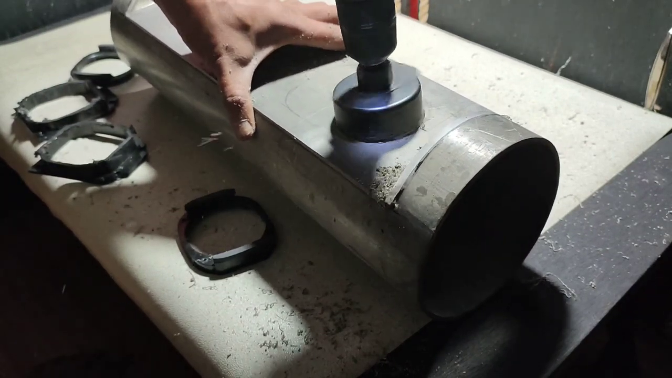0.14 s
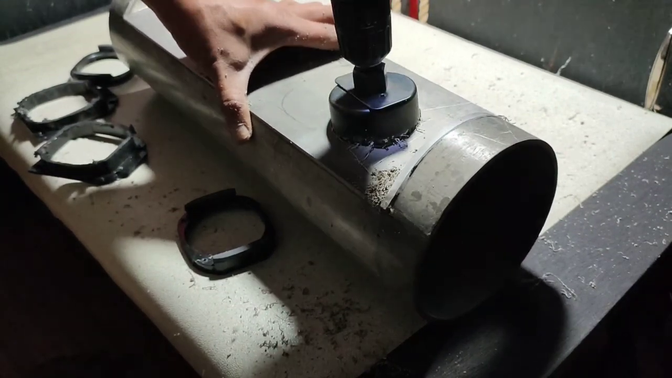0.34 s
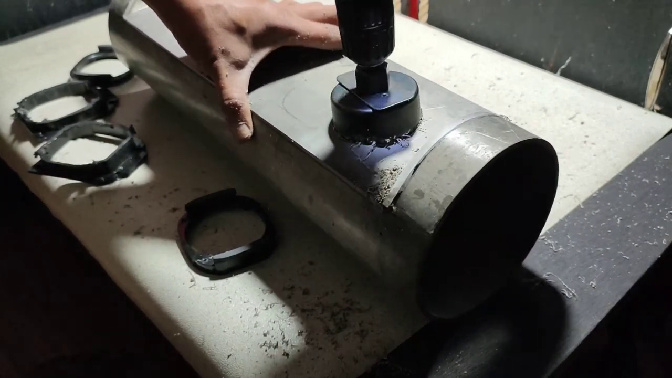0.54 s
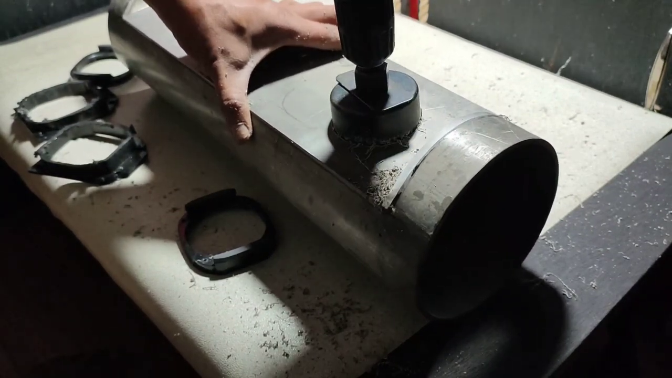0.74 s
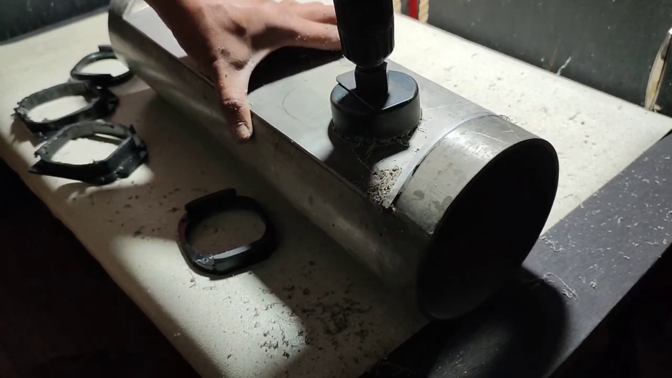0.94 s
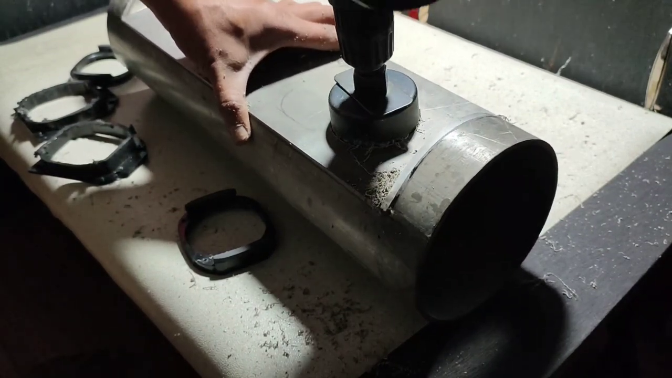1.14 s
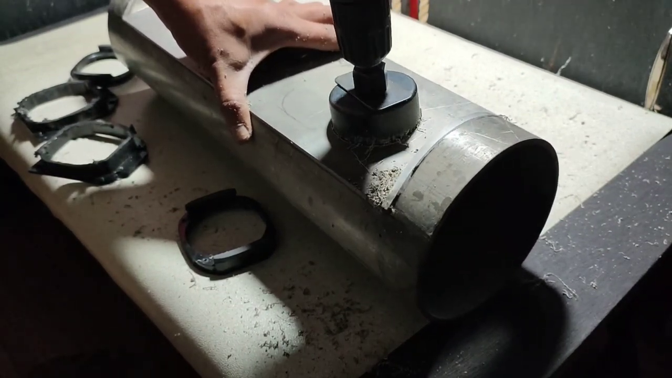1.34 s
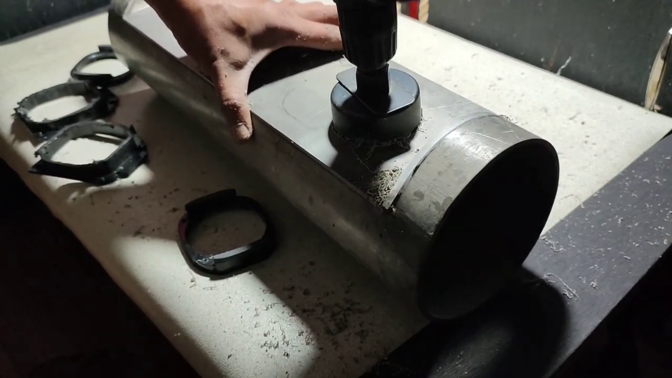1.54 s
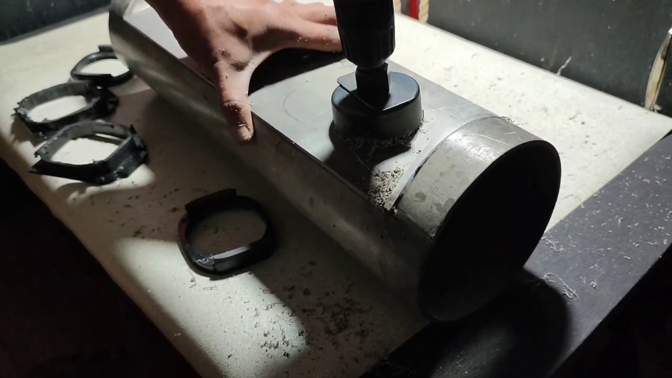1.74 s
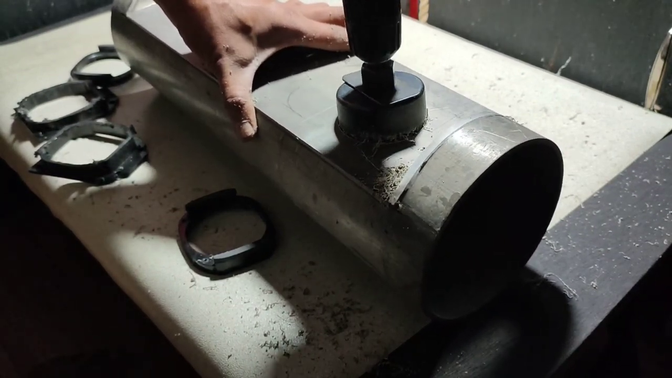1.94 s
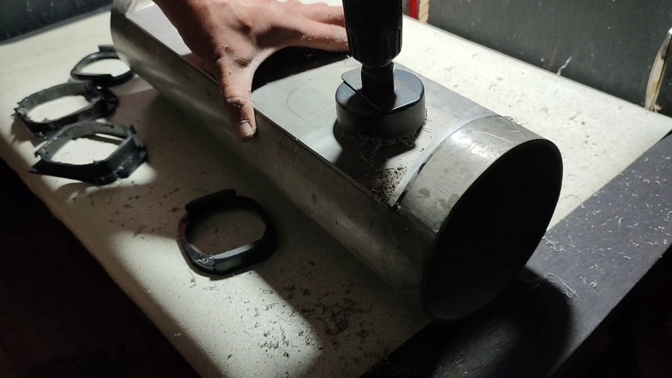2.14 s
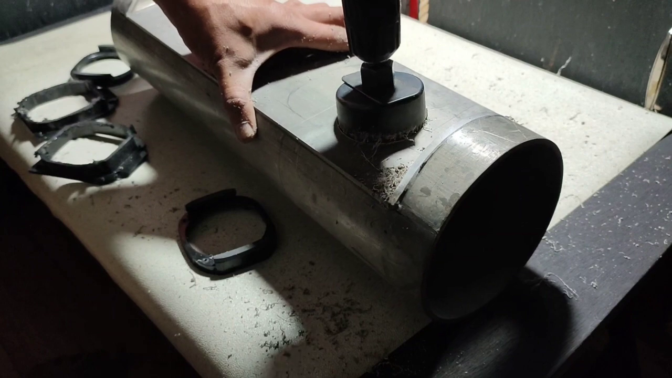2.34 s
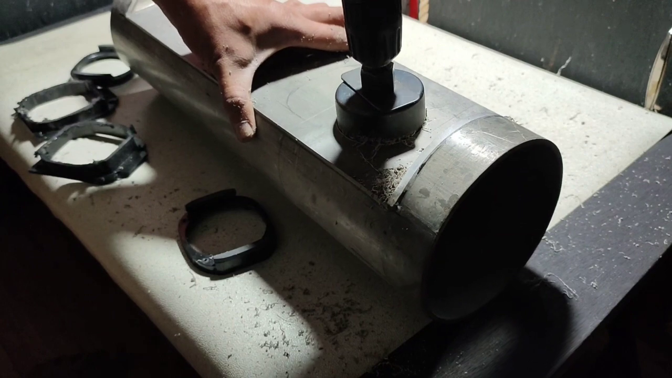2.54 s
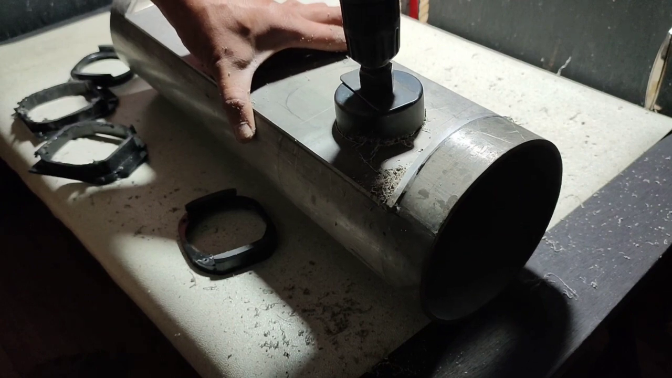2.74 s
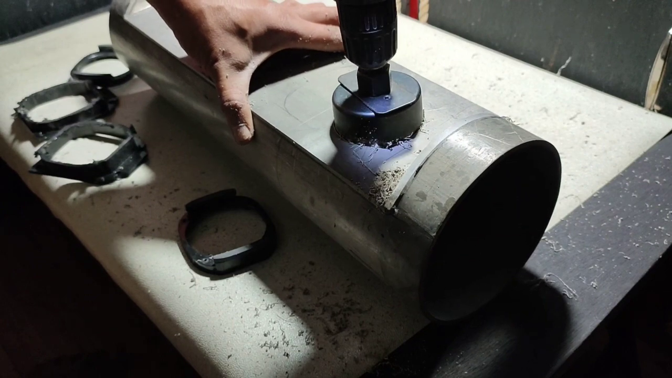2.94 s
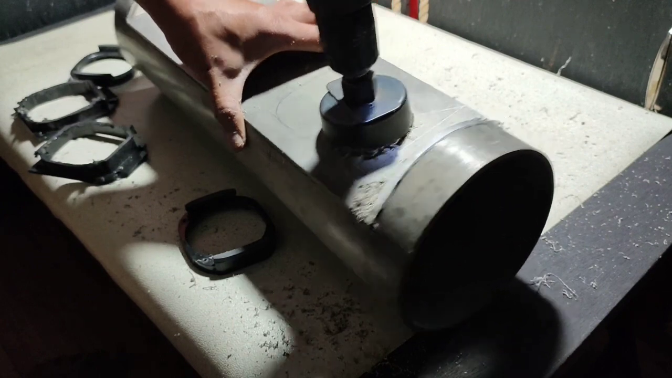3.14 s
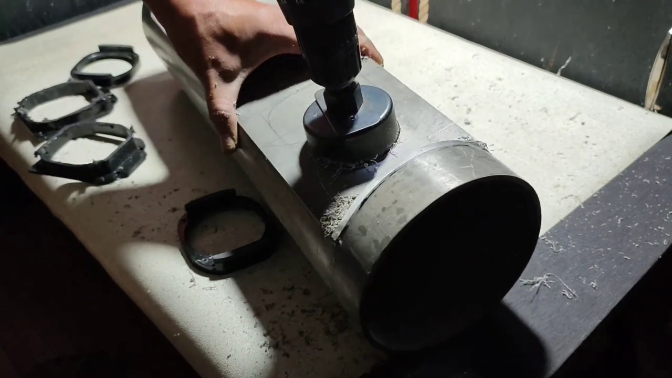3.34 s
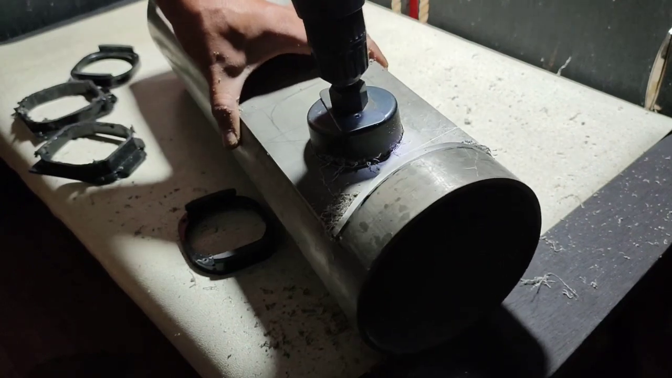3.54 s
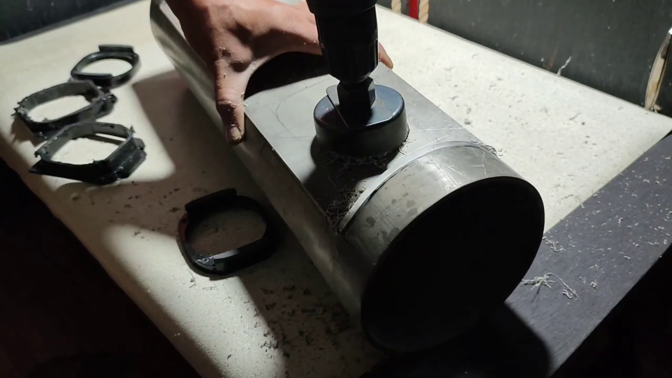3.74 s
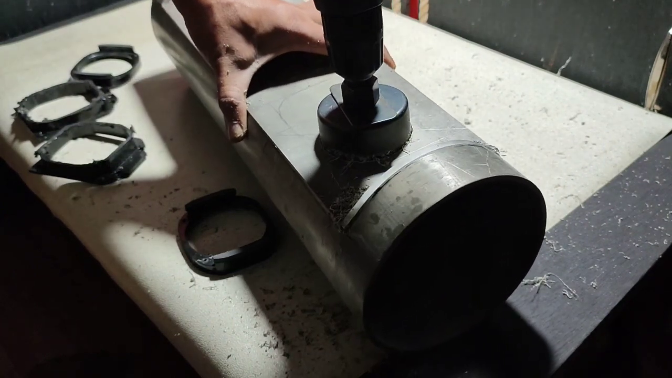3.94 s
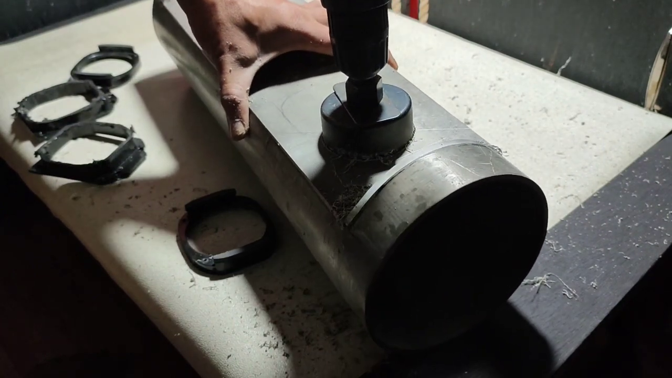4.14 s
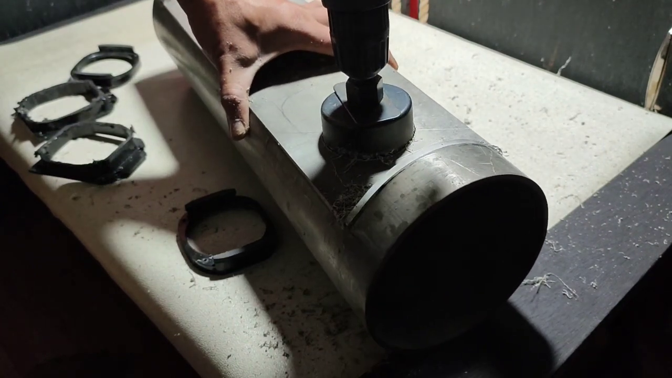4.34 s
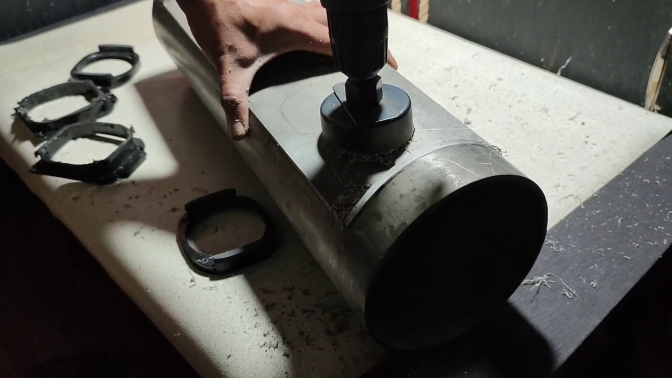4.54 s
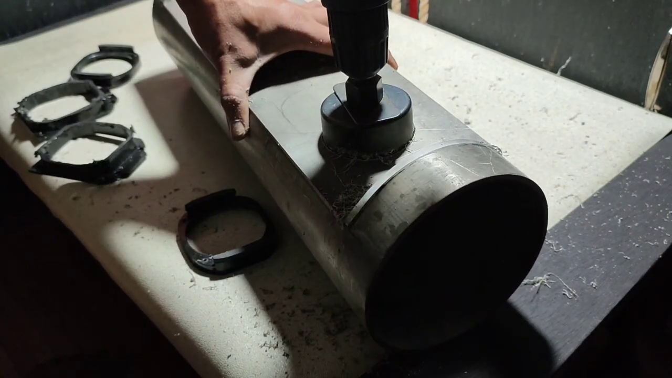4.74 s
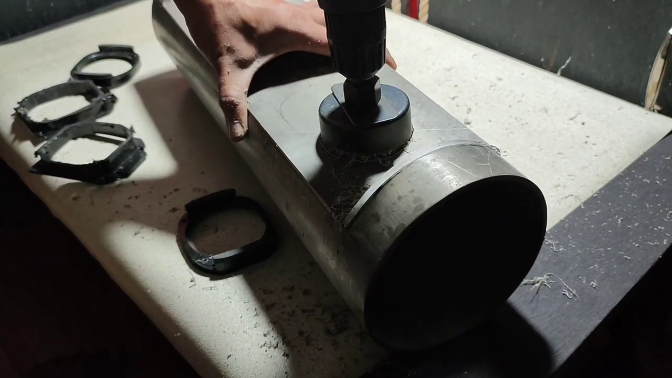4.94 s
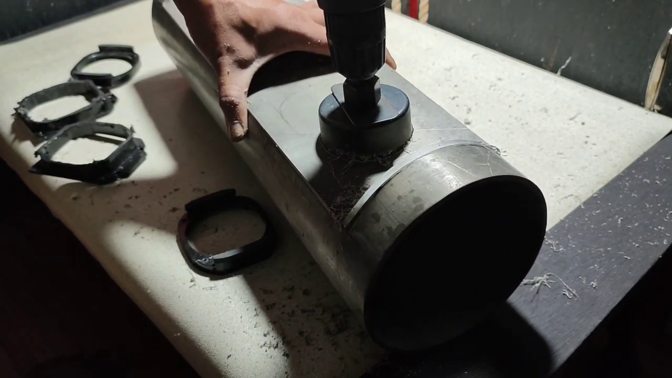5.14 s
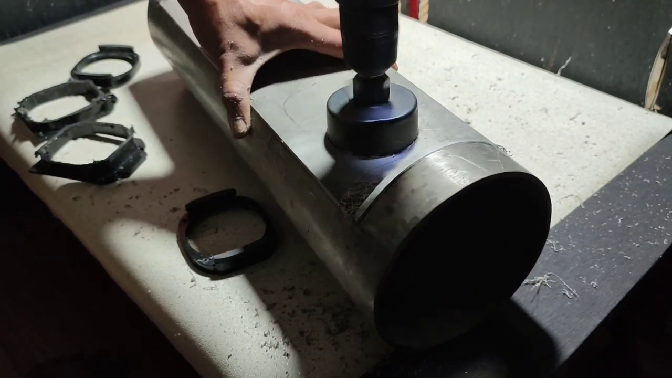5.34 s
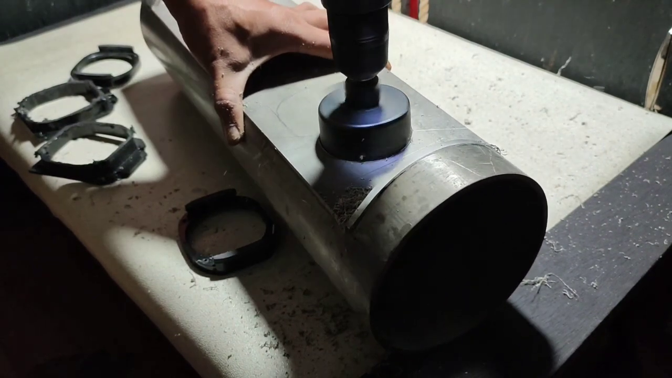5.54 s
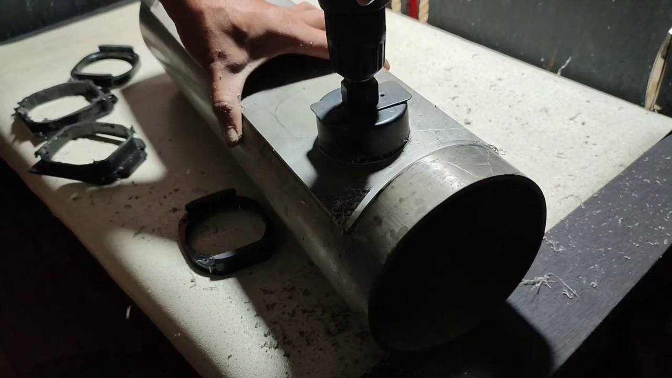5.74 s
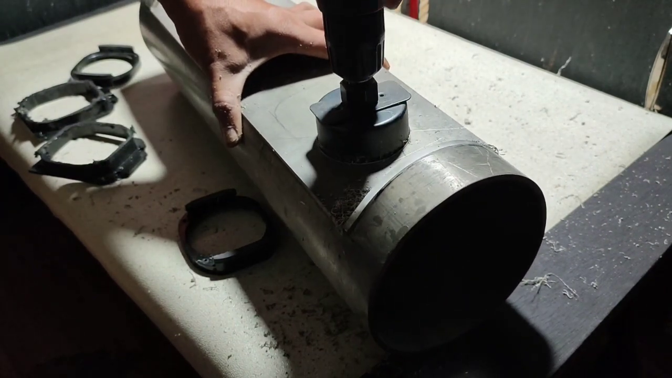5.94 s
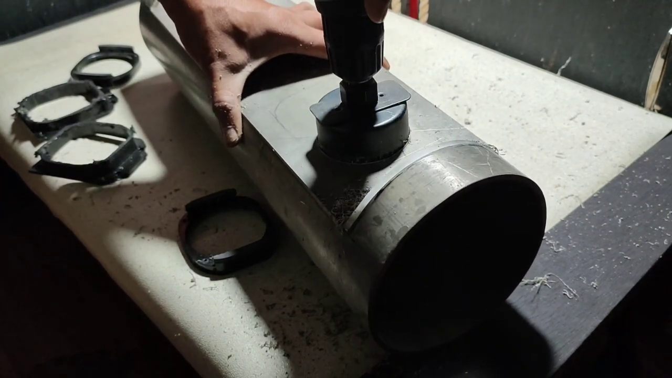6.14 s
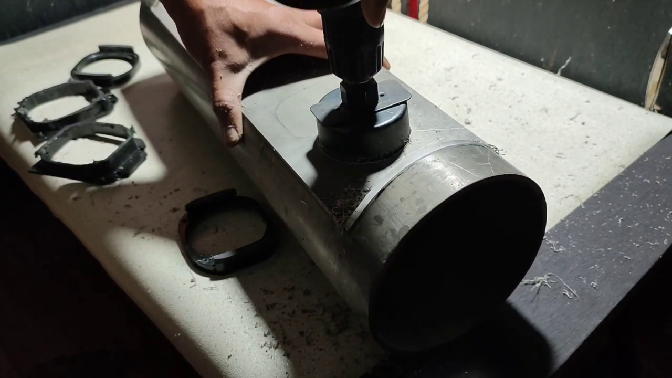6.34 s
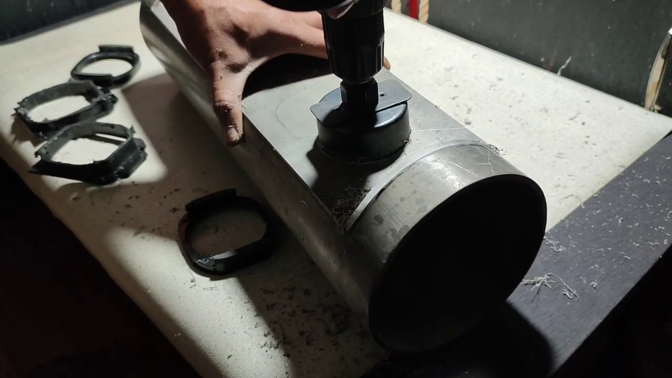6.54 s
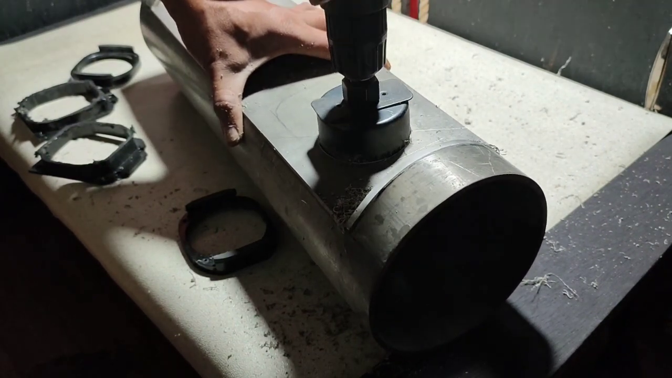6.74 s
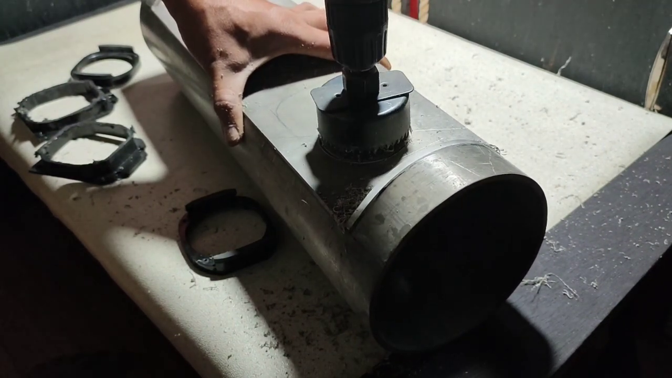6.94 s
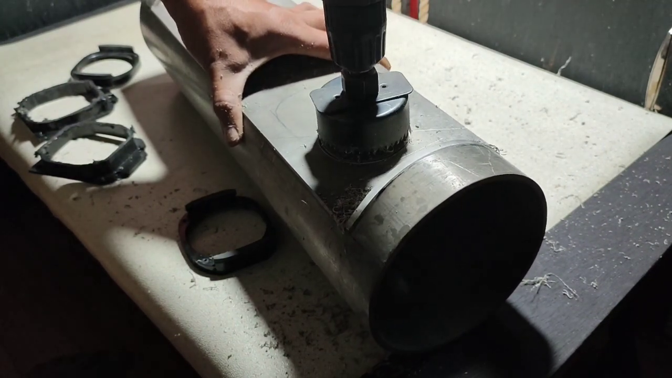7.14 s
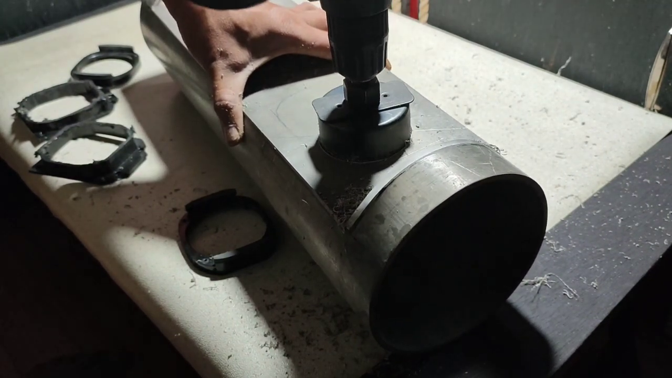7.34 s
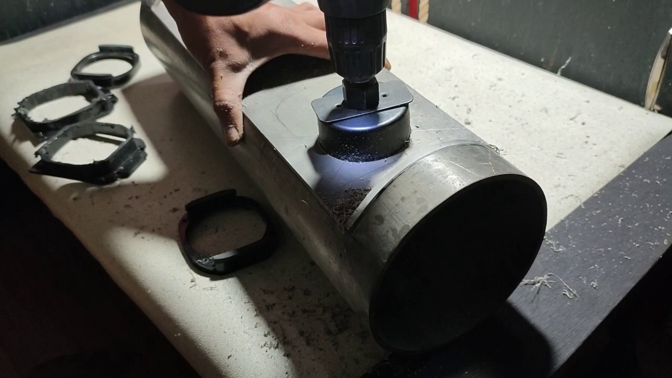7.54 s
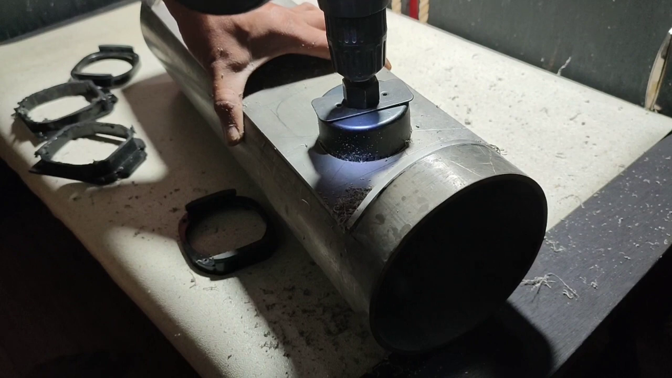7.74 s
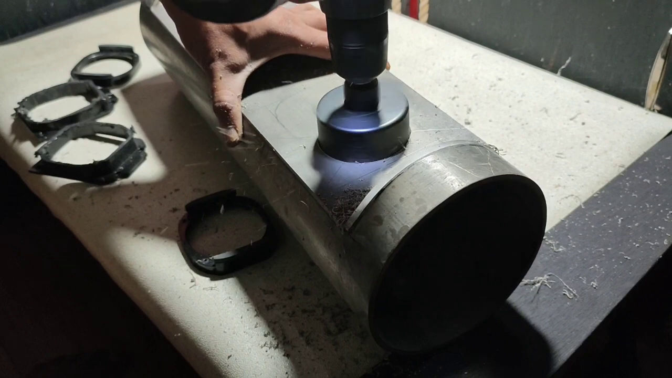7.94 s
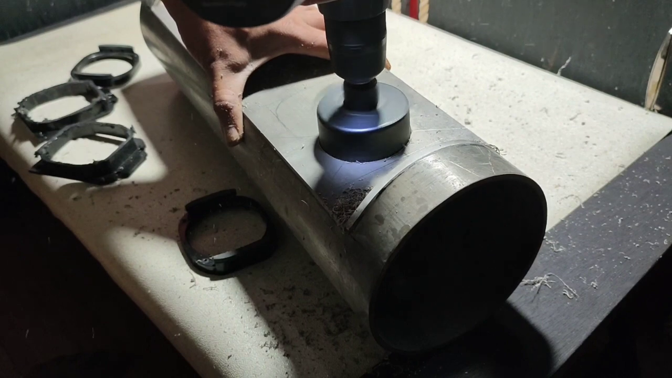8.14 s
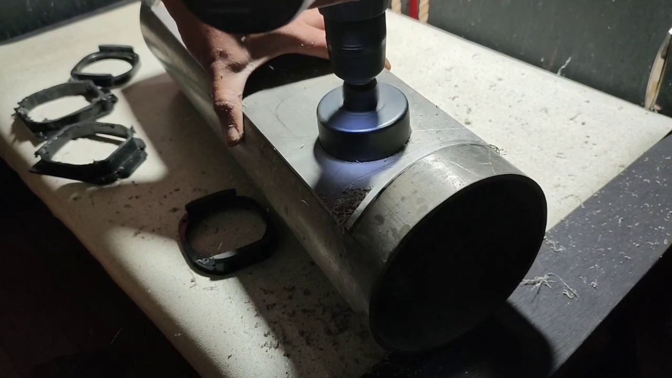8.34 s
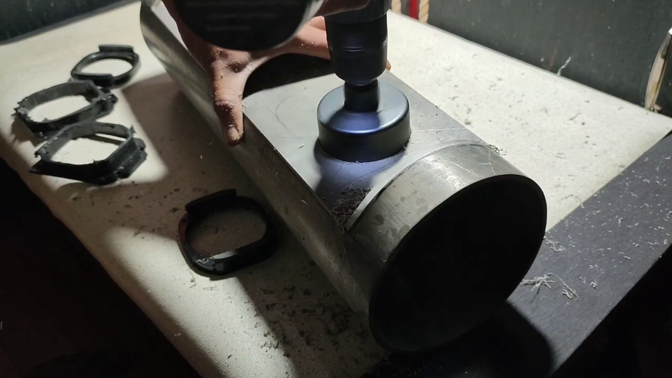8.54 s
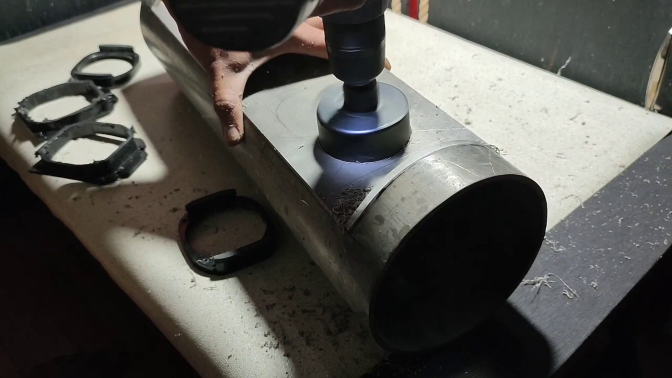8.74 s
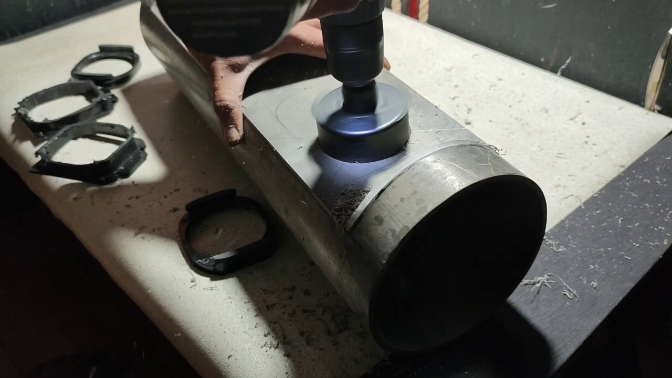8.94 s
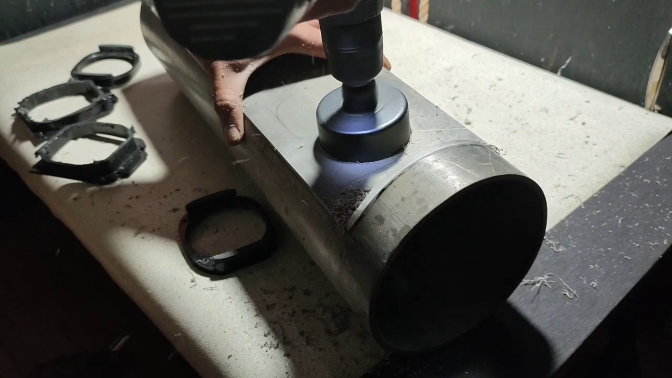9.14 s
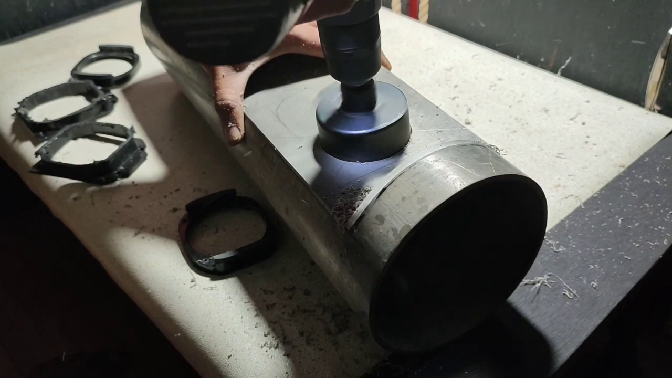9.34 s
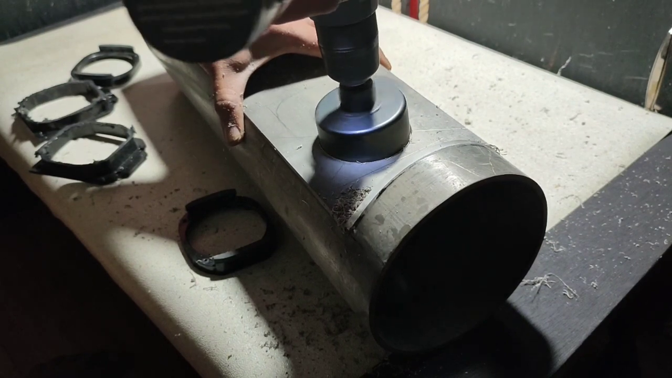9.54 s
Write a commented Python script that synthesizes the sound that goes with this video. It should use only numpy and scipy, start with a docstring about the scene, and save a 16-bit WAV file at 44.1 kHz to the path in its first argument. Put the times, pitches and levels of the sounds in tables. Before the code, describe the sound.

A cordless drill's hole saw rasps into hollow plastic pipe in two short groaning bursts, separated by quiet scrapes and clicks, then one long harsh run.

```python
"""A cordless drill drives a hole saw into a plastic drain pipe on a bench: two short bursts, then a long run.
Chip fractures surge once a turn and excite the modes of pipe wall and steel cup; the motor's whine dips once a
turn, and in the bursts the gears groan on a sliding note. Jammed teeth squawk, and caught teeth and the jolts
of starting and stopping knock the pipe. Around the runs the saw is rubbed round its groove, gears growl as it
is twisted, the speed controller whistles in the windings, and the switch clicks. The bench and room add echoes
over a low rumble of air."""
import sys
import numpy as np
from scipy import signal
from scipy.fft import rfft, irfft
from scipy.io import wavfile
from scipy.ndimage import uniform_filter1d

SR = 44100
rng = np.random.default_rng(int(sys.argv[2]) if len(sys.argv) > 2 else 0)


def put_to_file(sound):
    """Save the sound as 16-bit audio at rate SR, in the file named by the first command-line argument."""
    columns = np.atleast_2d(sound).T  # one column per channel
    safe = np.clip(columns, -1, 1)
    whole_steps = np.round(safe * 32767)
    wavfile.write(sys.argv[1], SR, whole_steps.astype(np.int16))


N = 422461
TIME = np.arange(N) / SR
QUADRATURE = np.array([[0], [np.pi / 2]])  # phase of mid and side: a quarter cycle apart


def undb(db):
    """Logarithmic level: decibels become an amplitude gain."""
    return 10 ** (np.asarray(db) / 20)


def unit(x):
    """Power normalisation: scale to rms 1."""
    return x / np.sqrt(np.mean(x ** 2))


def mid_side(side_db):
    """Stereo width: gains that leave the mid alone and set the side."""
    return np.array([[1], [undb(side_db)]])


def walk(rate, size):
    """Band-limited random modulation: levels held 1 / rate s and smoothed twice, rms 1."""
    hold = max(int(SR / rate), 1)
    held = np.repeat(rng.standard_normal(size // hold + 1), hold)
    smooth = uniform_filter1d(uniform_filter1d(held, hold), hold)
    return unit(smooth[:size])


def colour(x, points):
    """Minimum-phase filtering: a causal response through (frequency [Hz], gain [dB]) points."""
    hz, db = np.transpose(points)
    size = 8192
    bins = np.maximum(np.arange(size // 2 + 1) * SR / size, 1)
    gain = undb(np.interp(np.log(bins), np.log(hz), db))
    # folding the cepstrum onto positive time gives the minimum phase
    cepstrum = irfft(np.log(gain))
    cepstrum[1:size // 2] *= 2
    cepstrum[size // 2 + 1:] = 0
    response = irfft(np.exp(rfft(cepstrum)))
    return signal.fftconvolve(x, response[None])[:, :x.shape[1]]


def band(x, lo_hz, hi_hz, order=2):
    """Band limitation: a Butterworth band-pass."""
    edges = [lo_hz, min(hi_hz, SR / 2 - 1)]
    return signal.sosfilt(signal.butter(order, edges, "band", fs=SR, output="sos"), x)


def ring(x, modes):
    """Modal superposition: resonances driven by x, neighbours swinging in opposite senses."""
    total = 0
    for k, (hz, width, db) in enumerate(modes):
        mode = signal.lfilter(*signal.iirpeak(hz, hz / width, fs=SR), x)
        total = total + (-1) ** k * undb(db) * mode
    return total


def add(out, start, sound):
    """Linear superposition: mix a sound into a mid and side pair at a time in s."""
    i = max(int(start * SR), 0)
    part = sound[..., :out.shape[1] - i]
    out[:, i:i + part.shape[-1]] += part


def envelope(t, start, end, attack_s, release_s):
    """Exponential build-up and decay: swell from the start, hold, die away after the end."""
    swell = (1 - np.exp(-np.maximum(t - start, 0) / attack_s)) ** 2
    return swell * np.exp(-np.maximum(t - end, 0) / release_s)


def chips(rate, spread_db, size):
    """Random impulse train: brittle fractures, most small and a few large, random in time and place."""
    hit = rng.random(size) < rate / SR
    sign = rng.choice([-1, 1], (2, size))  # mid and side
    strength = undb(spread_db * np.minimum(rng.exponential(size=size), 4))
    return unit(hit * sign * strength)


def contact(decay_s, rise_s=0.00086):
    """Broadband impact excitation: a short chattering contact, its spectrum flattened."""
    t = TIME[:SR // 10]
    fade = np.exp(-t / decay_s) * (1 - np.exp(-t / rise_s))
    spectrum = rfft(rng.standard_normal((2, len(t))) * fade)
    return irfft(spectrum / np.abs(spectrum)) * np.sqrt(fade)


def blow(sound, db):
    """Impact energy: scale a hit so that its mid holds the energy of one millisecond at this level."""
    return undb(db) * sound * np.sqrt(SR / 1000 / np.sum(sound[0] ** 2))


# spectrum of the workshop's still air: (frequency [Hz], relative level [dB])
AIR_SPECTRUM = [(5, -25.5), (12, -6), (17, -4.5), (25, -22), (45, -16), (65, -21), (113, -21), (149, -23.5),
                (279, -33.5), (339, -33.5), (603, -38), (794, -41), (989, -42), (1170, -46), (1580, -44.5),
                (14200, -58.5)]


def air(level_db=-61.5, side_db=-3, draught_db=-6):
    """Diffuse background noise: a low rumble, mostly alike on both sides, under a faint wide hiss."""
    mid, side = unit(colour(rng.standard_normal((2, N)), AIR_SPECTRUM))
    hiss = undb(side_db) * band(side, 350, 16000, order=1)
    draught = undb(draught_db) * band(side, 10, 24, order=2)
    side = hiss + draught
    return undb(level_db + 0.26 * walk(24.0, N)) * np.array([mid + side, mid - side])


ROOM_T60_S = 0.55


def workshop(x, near_db=-10, near_s=0.013, tail_db=-9, side_db=0, wide_hz=620, left_db=-0.38):
    """Reverberation: the bench scatters, the room decays; the bass is most alike at both microphones."""
    t = TIME[:int(.8 * SR)]
    near = np.exp(-t / near_s) * (t > .0012)
    tail = undb(-60 * t / ROOM_T60_S) * (1 - np.exp(-t / 0.0005))
    near = undb(near_db) * near / np.linalg.norm(near)
    tail = undb(tail_db) * tail / np.linalg.norm(tail)
    response = np.hypot(near, tail) * rng.standard_normal((2, len(t)))
    echoes = signal.fftconvolve(x, response, axes=1)[:, :N]
    mid, side = x + band(echoes, 250, 15000, order=1)
    side = undb(side_db) * band(side, wide_hz, 20000, order=1)
    return np.array([(mid + side) * undb(left_db), (mid - side) * undb(-left_db)])


# movements of switch and trigger:
# (start [s], base level [dB], housing thump re base [dB], steel ring re base [dB])
SWITCH_CLICKS = [(3.982, -55.5, -20, -23), (4.094, -66.5, 6, -14), (4.114, -63.5, 4, -14),
                 (4.159, -54, 4, -11), (4.639, -33, -1, -15), (4.671, -22.5, -7.5, -12),
                 (4.679, -45, 6, -13.5), (4.861, -56.5, -6, -12), (5.033, -57, -4, -5.5),
                 (5.261, -61, 2, -16.5), (5.367, -40, -6, -10.5), (6.245, -33, -5.5, -13.5),
                 (6.307, -24, -15, -26)]
# spectrum of the switch's snap: (frequency [Hz], relative level [dB])
SNAP_SPECTRUM = [(880, -51), (1500, -19), (2820, -4.5), (3460, 1), (3730, 1), (4300, -1), (5980, -5.5),
                 (7420, -0.5), (8870, -10), (11100, -5), (14200, -7.5)]
# modes of the drill housing: (frequency [Hz], width [Hz], relative level [dB])
HOUSING_MODES = [(269, 150, -5), (674, 160, -2), (1500, 2100, -9.5)]
# modes of loose chuck and saw: (frequency [Hz], width [Hz], relative level [dB])
STEEL_MODES = [(2050, 36, -7), (2200, 30, -5), (2342, 36, -7), (2580, 36, -8), (2830, 26, -3),
               (2950, 22, -2), (3128, 16, 0), (3240, 14, 1), (3394, 11, 2), (3548, 12, 1), (3703, 22, -2),
               (4200, 30, -6)]


def click(db, thump_db, ring_db, snap_db=-1.5, tick_db=-4, rattle_s=.07, rattle_rise_s=.005, rattle_db=0.5):
    """Impact and modal response: the switch snaps and ticks, the housing thumps, loose steel rattles on."""
    snap = blow(colour(contact(0.0079), SNAP_SPECTRUM), db + snap_db)
    thump = blow(ring(contact(0.0037), HOUSING_MODES), db + thump_db)
    tick = blow(colour(signal.unit_impulse((1, SR // 10)), SNAP_SPECTRUM), db + tick_db)
    t = TIME[:SR // 2]
    rattle = chips(1500, 1.5, len(t)) * np.exp(-t / rattle_s) * (1 - np.exp(-t / rattle_rise_s))
    out = blow(band(ring(rattle, STEEL_MODES), 1900, 5000), db + ring_db + rattle_db)
    add(out, 0, snap + thump)
    add(out, .0015, tick * np.array([[1], [.5]]))
    return out


# tones under a light trigger, higher for each notch:
# (start [s], end [s], trigger notch before rounding [count], level [dB], waver [share of pitch])
CONTROLLER_WHISTLES = [(0.576, .603, 0.5, -59, 0.0085), (0.587, .625, 2, -61, 0.013),
                       (2.929, 2.985, 0, -67, .002), (2.982, 3.04, 1, -62.5, 0.0048),
                       (3.033, 3.125, 2, -63, .005), (3.08, 3.19, 1, -66, .02), (3.124, 3.21, 2, -57, .014),
                       (3.567, 3.635, 2, -58, 0.018), (3.6, 3.66, 0, -70, .025),
                       (3.665, 3.715, 0, -73, .02), (5.342, 5.38, 2, -63, 0.012),
                       (7.486, 7.537, 0, -67, .001), (7.537, 7.828, 1, -65, .0003),
                       (7.825, 7.885, 2, -61, .01), (7.843, 7.865, 1, -66, .014),
                       (7.88, 7.93, 3, -52, .014), (7.92, 7.965, 4, -51, .012),
                       (7.955, 8.005, 5, -52, .012)]
WHISTLE_HZ, NOTCH_HZ = 3774, 264.3  # pitch at notch 0, and step per notch


def whistle(length, hz, waver, second_db=-8, third_db=-20, flutter_db=260, dull_hz=8000):
    """Magnetic excitation: chopped current sings in the windings; pitch and level waver as the rotor stirs."""
    size = int(max(length, .02) * SR)
    pitch = hz * (1 + waver * walk(420, size))
    phase = 2 * np.pi * np.cumsum(pitch) / SR + QUADRATURE
    # the case passes the octave of the lower notes only
    second = band(np.sin(2 * phase), 1000, dull_hz, order=8)
    tone = np.sin(phase) + undb(second_db) * second + undb(third_db) * np.sin(3 * phase)
    flutter = undb(flutter_db * waver * walk(160, size))
    return tone * flutter * signal.windows.tukey(size, min(SR / 100 / size, 1))


# short twists of the free saw: (start [s], length [s], level before a 2 dB cut [dB])
SAW_TWISTS = [(6.818, 0.13, -44.5), (7.244, 0.12, -44)]
# spectrum of the gearbox growl: (frequency [Hz], relative level [dB])
GROWL_SPECTRUM = [(60, -28), (118, 2), (165, -12.5), (225, 3), (270, 1.5), (335, 3.5), (430, -15),
                  (620, -17.5), (850, -13.5), (1250, -22.5), (1550, -17.5), (2050, -27), (2420, -20),
                  (2570, -15.5), (2750, -26), (4300, -29), (5300, -42), (8000, -35.5), (10000, -44),
                  (14000, -40)]
TWIST_ATTACK_S, TWIST_RELEASE_S = 0.017, 0.025


def twisting(length, db, growl_db=-2.0, side_db=-3):
    """Structure-borne sound: gear teeth tumble unevenly over each other and hum in the drill's body."""
    t = TIME[TIME < length + .12]
    teeth = chips(1500, 2.1, len(t)) * undb(2.0 * walk(111, len(t)))
    growl = unit(colour(teeth, GROWL_SPECTRUM)) * mid_side(side_db)
    return undb(db + growl_db) * envelope(t, 0, length, TWIST_ATTACK_S, TWIST_RELEASE_S) * growl


# bending modes of the pipe wall: (frequency [Hz], width [Hz], relative level [dB])
WALL_MODES = [(495, 60, -1), (569.4, 63, -1), (640, 50, 1.5), (693.4, 55, 2.5), (798, 50, -0.5),
              (833, 46, -1), (921, 37, 0), (1025, 60, -4.5), (1145, 75, -3), (1350, 130, -4.5),
              (1553, 110, -4)]
# slow modes of the whole pipe on the bench: (frequency [Hz], width [Hz], relative level [dB])
BODY_MODES = [(130, 36, -3.5), (167, 37, -1.5), (220.6, 28, 3), (280, 44, -2.5), (335, 47, -2.5),
              (440, 19, -15)]


def pipe(force, wall_gain, body_gain, wall_side_db=-3, body_side_db=-9):
    """Forced modal vibration: under a rough force the wall rings and the whole length thuds."""
    wall = unit(band(ring(force, WALL_MODES), 380, 1900)) * mid_side(wall_side_db)
    body = unit(band(ring(force, BODY_MODES), 70, 450)) * mid_side(body_side_db)
    return wall_gain * wall + body_gain * body


# strokes that ease the saw round in its groove:
# (start [s], length [s], scratch level [dB], whole-pipe thudding before a 1.5 dB cut [dB])
GROOVE_RUBS = [(0.523, 0.13, -65, -57), (0.675, 0.13, -72.5, -64), (0.884, 0.17, -83.5, -69.5),
               (1.073, 0.11, -66, -57), (1.321, 0.11, -71.5, -64.5), (1.576, 0.056, -70, -66),
               (1.647, 0.057, -82, -60), (1.748, 0.1, -73.5, -68), (1.903, 0.072, -76.5, -70),
               (2.124, 0.066, -73, -60.5), (2.35, 0.087, -70, -61.5), (2.569, 0.095, -70.5, -56.5),
               (3.189, 0.049, -57.5, -57), (3.213, 0.084, -51.5, -50), (3.332, .12, -64.5, -60.5),
               (3.485, 0.092, -61.5, -57), (3.607, 0.072, -64.5, -54.5), (3.789, 0.032, -63, -51),
               (4.848, 0.04, -67, -57), (4.925, 0.031, -70, -77), (6.888, 0.021, -59.5, -61),
               (7.304, 0.038, -67, -64)]
# spectrum of the scratch: (frequency [Hz], relative level [dB])
SCRATCH_SPECTRUM = [(650, -44), (1100, -20), (1390, -8.5), (1980, -4.5), (2370, -4), (5200, -10),
                    (7630, -9), (9150, -21), (12300, -17.5), (14000, -14)]
RUB_ATTACK_S, RUB_RELEASE_S = 0.009, 0.034


def rubbing(length, scratch_db, thud_db, wall_db=1.0, body_db=-1.5):
    """Stick-slip friction: barely turning teeth slip in the groove and the wall rings in step."""
    t = TIME[TIME < length + .15]
    slips = undb(2.4 * walk(161, len(t)))
    grit = unit(colour(chips(4000, 3.2, len(t)) * slips, SCRATCH_SPECTRUM))
    shaking = pipe(chips(1200, 1.5, len(t)) * slips, undb(scratch_db + wall_db), undb(thud_db + body_db))
    return envelope(t, 0, length, RUB_ATTACK_S, RUB_RELEASE_S) * (undb(scratch_db) * grit + shaking)


# the saw catches and knocks the pipe, or the drill jolts as it starts or stops: # (start [s], base level of
# crack and wall [dB], whole-pipe thud [dB], contact decay [s])
PIPE_KNOCKS = [(.305, -35, -22.5, 0.0062), (.783, -58, -45.5, 0.0031), (1.139, -35.5, -43, 0.0018),
               (1.144, -32.5, -37, 0.0026), (1.149, -33.5, -45, 0.0018), (1.481, -54, -55, 0.0022),
               (2.534, -56, -56, 0.0042), (3.223, -40, -61, 0.0029), (3.489, -47, -62, 0.0026),
               (3.56, -50, -40, 0.0032), (3.625, -47, -38, .003), (3.659, -64, -38.5, .003),
               (3.801, -52, -45, 0.0025), (3.813, -58, -35.5, 0.0023), (3.841, -50, -42, 0.0014),
               (4.885, -52, -44, 0.0023), (5.368, -36, -40, 0.0013), (5.384, -20, -19, 0.0036),
               (7.352, -45, -48, 0.0054), (7.896, -34, -31.5, 0.0023), (8.065, -25, -17.5, 0.0026),
               (8.437, -25, -27, 0.0025)]
# spectrum of the crack: (frequency [Hz], relative level [dB])
CRACK_SPECTRUM = [(53, -8.5), (90, -2.5), (208, -9.5), (418, -19.5), (741, -2.5), (1070, -13.5), (1520, -9),
                  (2100, -16.5), (2750, -27), (3440, -21), (12000, -52.5), (15600, -83.5), (22000, -120)]


def knock(db, thud_db, contact_s, side_db=-8, crack_db=-4.0, wall_db=-3.5):
    """Impact excitation: a dull crack, the wall rings hollow and the pipe thuds on the bench."""
    crack = band(colour(contact(contact_s), CRACK_SPECTRUM), 135, 15000, order=3)
    wall = band(ring(contact(contact_s), WALL_MODES), 380, 2600)
    thud = band(ring(contact(contact_s), BODY_MODES), 80, 320) * mid_side(side_db)
    return blow(crack, db + crack_db) + blow(wall, db + wall_db) + blow(thud, thud_db)


# a tooth jams, low in the pipe or high on the cup:
# (middle of the swell [s], pitch [Hz], length [s], level before the swell [dB])
TOOTH_SQUAWKS = [(0.009, 901, 0.024, -33), (0.071, 221, 0.032, -34), (0.289, 882, 0.027, -31.5),
                 (3.234, 1389, .03, -49.5), (3.251, 1373, .025, -49), (3.269, 721, .04, -51),
                 (3.528, 1320, .05, -61), (3.621, 732, .03, -57), (5.397, 221.4, .04, -29.5),
                 (8.019, 1278, .03, -32), (8.028, 2700, .035, -31), (8.062, 2313, .018, -32),
                 (8.188, 2490, .04, -27), (8.223, 880, .022, -32), (8.279, 888, .026, -25.5),
                 (8.297, 2460, .02, -26.5), (8.331, 890, .034, -27), (8.386, 897, .036, -25),
                 (8.392, 2546, .03, -25), (8.44, 871, .02, -23.5), (8.443, 2570, .025, -30),
                 (8.499, 2496, .025, -28), (8.567, 3400, .022, -31), (8.626, 3330, .026, -26.5),
                 (8.806, 900, .045, -28.5), (8.875, 896, .034, -30), (8.88, 3330, .03, -36),
                 (9.014, 3490, .028, -30), (9.097, 892, .028, -29), (9.169, 890, .026, -27.5),
                 (9.298, 3340, .028, -29), (9.306, 897, .034, -26), (9.378, 894, .03, -23),
                 (9.449, 896, .022, -27)]


def squawk(hz, length, jitter=0.04, flutter_db=2, side_db=-4):
    """Self-excited oscillation: a jammed tooth pumps one mode, a rough note that swells and lets go."""
    size = int(max(length, .005) * SR)
    pitch = hz * (1 + jitter * walk(900, size))
    phase = 2 * np.pi * np.cumsum(pitch) / SR + QUADRATURE
    note = unit(np.sin(phase) * undb(flutter_db * walk(428, size)))
    return note * np.hanning(size) * mid_side(side_db)


# in the bursts the gear mesh groans on a sliding note, one curve a groan: (time [s], pitch [Hz], level [dB])
GROAN_CURVES = [
    [(.09, 651.5, -43.5), (.12, 624, -36.5), (.16, 782.4, -37), (.18, 739, -42.5), (.2, 799, -40.5),
     (.235, 647, -35), (.3, 679, -41)],
    [(5.49, 656, -45.5), (5.505, 688.5, -35.5), (5.555, 695, -36.5), (5.61, 715, -39), (5.64, 825, -34.5)],
    [(5.53, 469, -40), (5.56, 489, -37), (5.64, 492, -46)],
]
# harmonics of a groan from the fundamental up: relative level [dB]
GROAN_HARMONICS = [-1, -3.5, -17]


def groaning(curve, jitter=.018, flutter_db=3.0, side_db=-4):
    """Gear-mesh tone: the gears groan on a rough, sliding note with a few harmonics."""
    times, hz, db = np.transpose(curve)
    t = TIME[(TIME >= times[0]) & (TIME <= times[-1])]
    size = len(t)
    pitch = np.interp(t, times, hz) * (1 + jitter * walk(400, size))
    phase = 2 * np.pi * np.cumsum(pitch) / SR + QUADRATURE
    tone = 0
    for k, level in enumerate(GROAN_HARMONICS):
        tone = tone + undb(level + flutter_db * walk(200, size)) * np.sin((k + 1) * phase)
    loudness = undb(np.interp(t, times, db)) * signal.windows.tukey(size, .1)
    return unit(tone) * loudness * mid_side(side_db)


# lines of the gear train: (order [cycles per spindle turn], relative level [dB])
GEAR_ORDERS = [(47.5, -39.5), (81, -59.5), (100, -52.5), (139, -47)]


def gearing(shaft, flutter_db=4.0, blur=.8):
    """Gear-mesh orders: rough lines locked to the spindle angle (turns), blurred in phase (rad)."""
    size = len(shaft)
    sides = np.zeros((2, size))
    for side in sides:
        for order, db in GEAR_ORDERS:
            level = undb(db + flutter_db * walk(160, size))
            side += level * np.sin(2 * np.pi * order * shaft + blur * walk(90, size))
    return sides


WHINE_ORDER = 284  # cycles per spindle turn


def whining(shaft, flutter_db=3.0, blur=.45):
    """Rotational order: the motor's high, broken whine follows the shaft and dips once a turn."""
    size = len(shaft)
    phase = 2 * np.pi * WHINE_ORDER * shaft + blur * walk(500, size) + QUADRATURE
    return unit(np.sin(phase) * undb(flutter_db * walk(220, size)))


# modes of the steel saw cup: (frequency [Hz], width [Hz], relative level [dB])
CUP_MODES = [(1262, 44, -6), (1580, 44, -2), (2045, 70, -4), (2256, 44, 2), (2490, 50, 2.5), (2578, 60, -1),
             (3105, 100, -4), (3230, 100, -2), (3394, 100, -.5), (3530, 100, 1.5), (4510, 200, -7),
             (5020, 200, -5)]


def chatter(size, rate=380, detune=0.041, ring_s=0.0022, spread_db=6.5):
    """Friction-excited modes: single teeth stick and the cup chatters for milliseconds near one mode."""
    out, t = np.zeros((2, size)), TIME[:SR // 30]
    swell = t / ring_s * np.exp(-t / ring_s)
    for when, mode, pitch, strength, place in rng.random((int(rate * size / SR), 5)):
        hz, _, db = CUP_MODES[int(mode * len(CUP_MODES))]
        phase = 2 * np.pi * hz * (1 + detune * (2 * pitch - 1)) * t
        gain = undb(db - spread_db * np.log(max(strength, .08)))
        add(out, when * size / SR, gain * swell * np.sin([phase, phase + 2 * np.pi * place]))
    return unit(out)


# runs of the saw: (start [s], stop [s], moment of one hard bite [s], cup level re tearing [dB], # gear level at
# usual speed [dB], surge once a turn [dB], speed swing once a turn [share])
SAW_RUNS = [(-.05, .322, 0.048, -12.5, 0.5, -0.7, 0.0025), (5.379, 5.785, 5.46, -14.5, -2, 0.5, 0.0023),
            (7.889, 9.6, 8.812, -7, -3, 0.85, 0.02)]
# spindle speed in each run: (time [s], speed [turns/s])
FIRST_SPEED = [(0, 14.6), (.045, 12.3), (.06, 14), (.078, 16.8), (.095, 16.7), (.11, 14.4), (.125, 12.3),
               (.145, 12.6), (.165, 15.4), (.18, 17.1), (.2, 17), (.24, 14), (.31, 12.5), (.335, 3.6)]
SECOND_SPEED = [(5.35, 2), (5.398, 15.5), (5.43, 16.1), (5.46, 14), (5.535, 13.5), (5.565, 16.3),
                (5.59, 16.1), (5.68, 18.5), (5.77, 12.4), (5.802, 8.8)]
LONG_SPEED = [(7.86, 2), (7.9, 7), (7.94, 12), (8, 15.9), (8.1, 18.1), (8.4, 18.2), (8.55, 17.5),
              (8.7, 16.7), (8.8, 15.8), (8.87, 14.9), (8.95, 14.15), (9.05, 13.65), (9.2, 13.9),
              (9.35, 13.75), (9.58, 13.3)]
# levels as the saw is pressed in: (time [s], tearing at usual speed [dB], pipe wall [dB],
# whole pipe [dB], rim mode [dB], motor whine [dB])
FIRST_FEED = [(0, -31, -32, -39.5, -41.5, -53), (.06, -32.5, -36.5, -34, -41, -47),
              (.085, -32, -33.5, -40, -50, -38.5), (0.123, -31, -36, -41, -53, -39.5),
              (0.189, -32.5, -32, -49, -49, -36.5), (.22, -33.5, -34.5, -40.5, -48.5, -49),
              (.29, -32, -38, -38.5, -49, -46.5)]
SECOND_FEED = [(5.372, -28, -45.5, -51, -63.5, -43.5), (5.39, -34, -31.5, -45, -48, -50),
               (5.425, -29.5, -32.5, -40, -45.5, -42), (5.46, -34.5, -37.5, -41, -44, -54.5),
               (5.535, -32, -34.5, -37, -46, -51), (5.58, -30, -32, -47.5, -50.5, -36.5),
               (5.61, -33.5, -37.5, -38.5, -58, -51.5), (5.68, -30.5, -38, -44, -46, -51),
               (5.78, -32, -37, -39, -44.5, -54.5)]
LONG_FEED = [(7.9, -35, -51.5, -45, -73, -49), (8.002, -41.5, -79, -45, -70, -64),
             (8.018, -28, -42, -43, -58, -56), (8.045, -33, -59, -42, -67, -52),
             (8.065, -28, -43, -38, -40, -53), (8.2, -29, -40, -42, -38, -48),
             (8.41, -29.5, -41.5, -39.5, -39.5, -48), (8.52, -28, -40.5, -39, -37.5, -48),
             (8.66, -28, -43, -38, -40, -55), (8.82, -28.5, -36, -37, -40, -45),
             (8.86, -28, -35.5, -38, -48, -33), (8.92, -28.5, -36, -35, -44, -33.5),
             (8.96, -28, -36.5, -38, -43, -43), (9.22, -29, -36, -38.5, -40, -38.5),
             (9.38, -28.5, -36.5, -40, -38, -39), (9.58, -27.5, -28.5, -39.5, -39, -42)]
# spectrum of the tearing teeth: (frequency [Hz], relative level [dB])
TEETH_SPECTRUM = [(650, -30.5), (1100, -7), (1360, -9.5), (1580, -3.5), (1760, -5), (1980, -3),
                  (2510, -5.5), (2850, -5.5), (3460, -2.5), (3730, -5.5), (5600, -9), (7880, -8.5),
                  (10600, -20.5), (11700, -14), (14200, -23.5)]
# rim mode of the pipe: (frequency [Hz], width [Hz], relative level [dB])
RIM_MODES = [(882, 65, 0)]
FADE_IN_S, FADE_OUT_S = .008, .008  # time constants of a run's loudness
USUAL_TURNS_PER_S = 16.64
# a faster saw tears louder, and rings its cup harder still
TEAR_DB_PER_OCTAVE, CUP_DB_PER_OCTAVE = 7, 6.5


def sawing(run, speed, feed, cup_db=-1, rim_surge_db=2, rim_lead_turns=.1, rim_side_db=-4, play=.004):
    """Periodic modulation: a saw slightly askew bites hardest once a turn; returns (start in s, sound)."""
    start, stop, bite_at, chatter_db, gears_db, surge_db, drag = run
    t = TIME[(TIME >= start - 10 * FADE_IN_S) & (TIME <= stop + 10 * FADE_OUT_S)]
    size = len(t)
    times, *levels = np.transpose(feed)
    tearing, wall, body, rim, whine = (undb(np.interp(t, times, db)) for db in levels)
    turns_s = np.interp(t, *np.transpose(speed), left=0)
    turn = np.cumsum(turns_s) / SR
    turn = turn - np.interp(bite_at, t, turn)  # whole turns fall on the hard bites
    bite = np.cos(2 * np.pi * turn)
    pace = np.maximum(turns_s, 1) / USUAL_TURNS_PER_S
    octaves = np.log2(pace)
    power = np.exp(-np.maximum(t - stop, 0) / FADE_OUT_S) / (1 + np.exp((start - t) / FADE_IN_S))

    # tearing chips also ring the cup, over the squeaks of single teeth
    fractures = chips(8000, 1.2, size) * undb(surge_db * bite + 0.78 * walk(250, size))
    squeaks = unit(chatter(size) * undb(1.5 * surge_db * bite))
    cup = squeaks + undb(cup_db) * unit(band(ring(fractures, CUP_MODES), 1500, 6000))
    steel = undb(chatter_db + CUP_DB_PER_OCTAVE * octaves) * cup
    cutting = tearing * undb(TEAR_DB_PER_OCTAVE * octaves) * (unit(colour(fractures, TEETH_SPECTRUM)) + steel)

    # teeth snag and let go, which shakes the pipe; its rim is rung hardest as each bite begins
    snags = chips(1800, 1.7, size)
    rim_surge = undb(rim_surge_db * np.cos(2 * np.pi * (turn + rim_lead_turns)))
    rung = unit(band(ring(snags * rim_surge, RIM_MODES), 700, 1100))
    shaking = pipe(snags, wall, body) + rim * rung * mid_side(rim_side_db)

    # once a turn the motor is dragged down, and play in the gears blurs their lines
    shaft = np.cumsum(turns_s * (1 + play * walk(150, size) - drag * bite)) / SR
    gears = undb(gears_db) * pace ** 2 * gearing(shaft)
    return t[0], power * (cutting + shaking + gears + whine * whining(shaft))


def scene():
    """Superposition of sources: drill, saw and pipe sound from one spot on the bench."""
    out = np.zeros((2, N))
    speeds = [FIRST_SPEED, SECOND_SPEED, LONG_SPEED]
    feeds = [FIRST_FEED, SECOND_FEED, LONG_FEED]
    for run, speed, feed in zip(SAW_RUNS, speeds, feeds):
        add(out, *sawing(run, speed, feed))
    for curve in GROAN_CURVES:
        add(out, curve[0][0], groaning(curve))
    for middle, hz, length, db in TOOTH_SQUAWKS:
        add(out, middle - length / 2, undb(db) * squawk(hz, length))
    for start, length, scratch_db, thud_db in GROOVE_RUBS:
        add(out, start, rubbing(length, scratch_db, thud_db))
    for start, length, db in SAW_TWISTS:
        add(out, start, twisting(length, db))
    for start, db, thud_db, contact_s in PIPE_KNOCKS:
        add(out, start, knock(db, thud_db, contact_s))
    for start, db, thump_db, ring_db in SWITCH_CLICKS:
        add(out, start, click(db, thump_db, ring_db))
    for start, end, notch, db, waver in CONTROLLER_WHISTLES:
        hz = WHISTLE_HZ + NOTCH_HZ * round(notch)
        add(out, start, undb(db) * whistle(end - start, hz, waver))
    return workshop(out) + air()


TOP_HZ = 14400


def record(dry):
    """Band limitation: a steep elliptic low-pass cuts the top."""
    return signal.sosfilt(signal.ellip(12, .2, 90, TOP_HZ, fs=SR, output="sos"), dry)


dry = scene()
out = record(dry)
put_to_file(out)
```